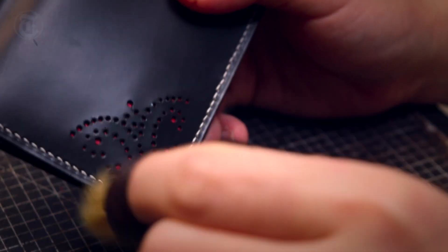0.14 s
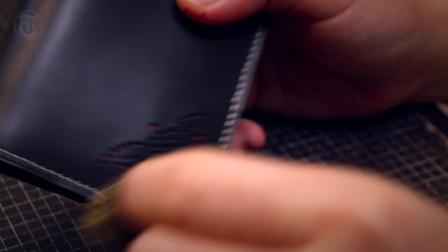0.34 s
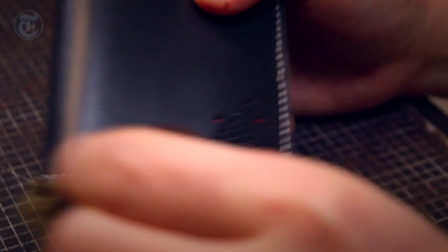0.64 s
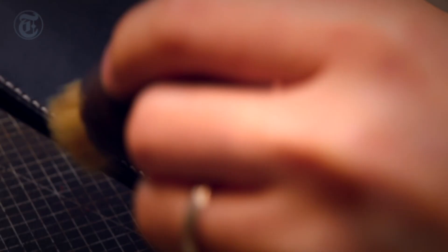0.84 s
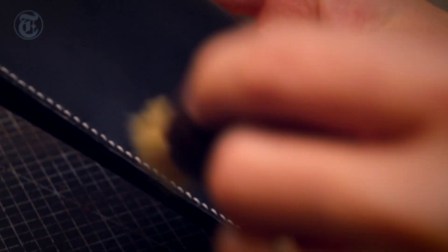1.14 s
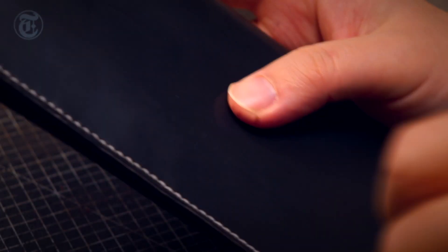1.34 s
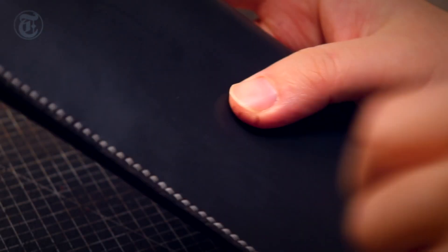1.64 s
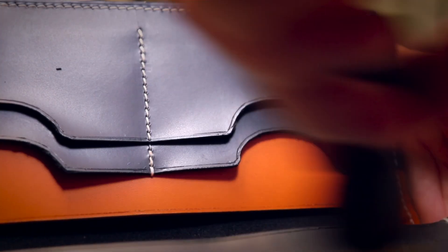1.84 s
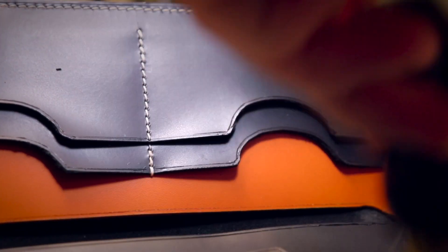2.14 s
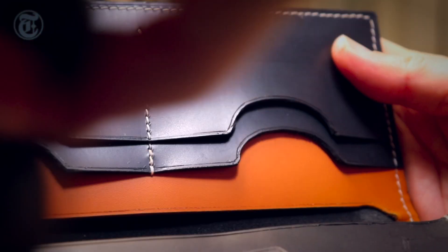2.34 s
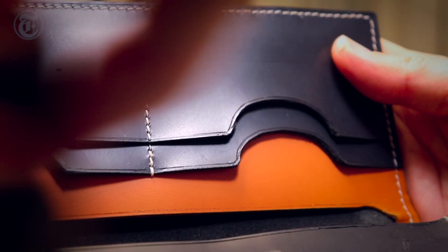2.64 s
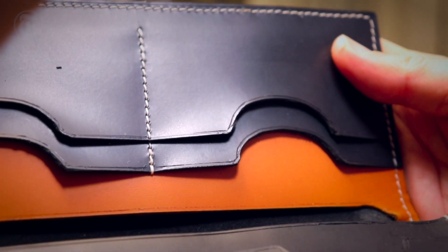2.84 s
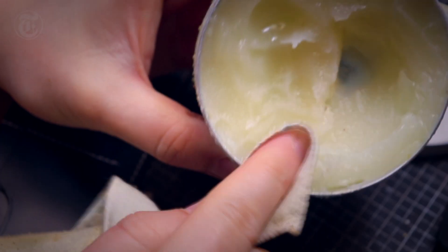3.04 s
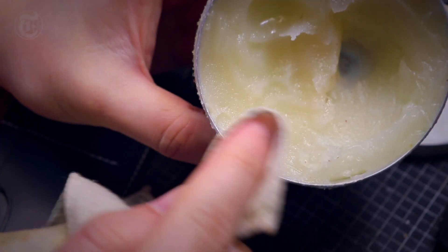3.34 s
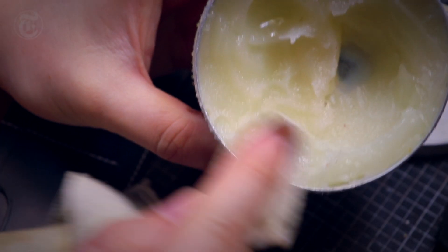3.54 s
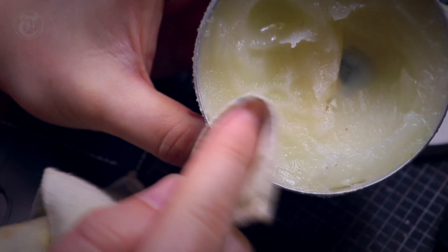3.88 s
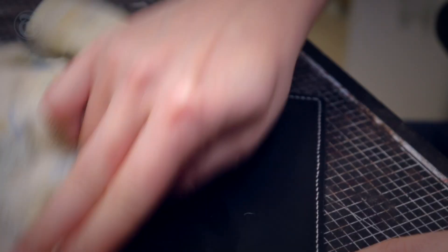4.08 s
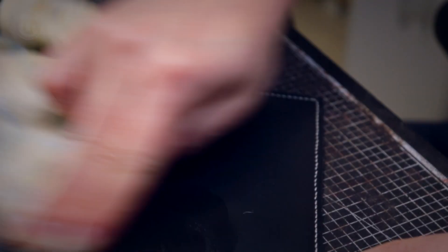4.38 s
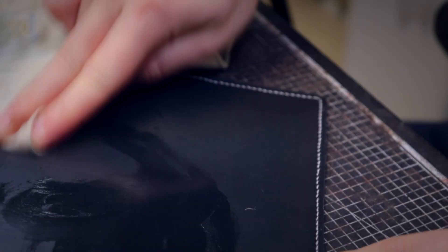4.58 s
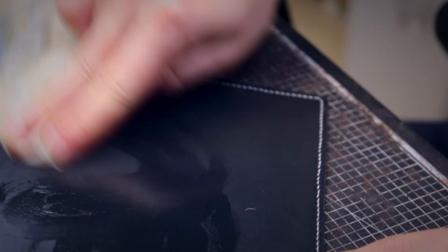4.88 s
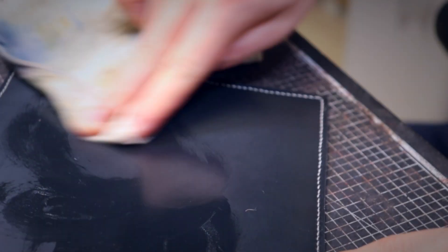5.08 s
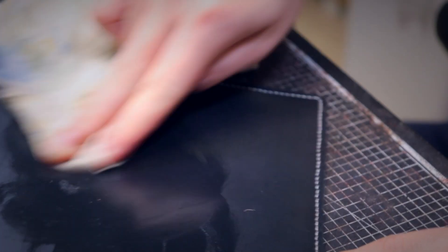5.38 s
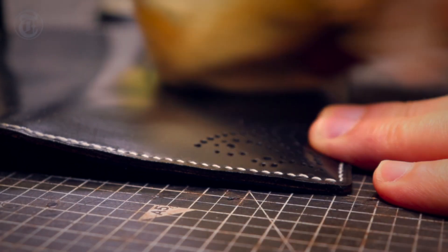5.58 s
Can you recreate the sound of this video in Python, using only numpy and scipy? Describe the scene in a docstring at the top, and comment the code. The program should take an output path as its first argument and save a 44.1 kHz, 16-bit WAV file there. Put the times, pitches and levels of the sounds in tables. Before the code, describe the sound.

Dry, close, centred handling sounds over quiet hum, hiss and faint rumble. First come irregular brisk brush swishes on a leather wallet, some starting with a tuft slap; next three fuller scratchy sweeps across inner pockets, catching on edges. A near-quiet gap holds only faint dabs and tiny sharp clicks of balm and tin. Then steady soft cloth friction swells about eight times a second, with small gripping scrapes and dull bumps, before a smooth final wipe.

```python
"""Brushing and balming a leather wallet

A small bristle brush sweeps seven times over the outside of the wallet, then three times over its inner
pockets. A cloth-wrapped finger picks up balm from a tin with sticky ticks, then rubs it into the leather.
Rubbing is random fibre slips through resonant filters; slaps and snaps are short filtered excitations.
A hollow room resonance near 900 Hz answers strokes, slaps and grips; hum, hiss and rumble lie under it, in mono."""
import sys
import numpy as np
from scipy import signal
from scipy.fft import rfft, irfft
from scipy.io import wavfile
from scipy.ndimage import uniform_filter1d

SR = 44100
rng = np.random.default_rng(int(sys.argv[2]) if len(sys.argv) > 2 else 0)


def generate_wav(signal):
    """Clip the signal to [-1, 1] and save it as 16-bit WAV at the path in sys.argv[1]."""
    frames = np.transpose(np.atleast_2d(signal))
    scaled = np.clip(frames, -1, 1) * 32767
    pcm = np.round(scaled).astype(np.int16)
    wavfile.write(sys.argv[1], SR, pcm)


N = 252115

TIME = np.arange(N) / SR  # s
TAPS = 8192  # filter design length, samples
HZ = np.fft.rfftfreq(TAPS, 1 / SR)
LAND_S = .006  # the fibres touch down
# spectrum of the cloth's contact: frequency_hz, relative density_db (per Hz)
CLOTH_SPECTRUM = [(650, -23), (1100, -1), (1640, -3.5), (1790, 1.5), (2070, -3.5), (3660, 2.5),
                  (4140, -2.5), (5440, 1), (7380, -3), (14100, -1.5), (15200, -4), (15900, -12),
                  (16500, -42)]


def amp(db):
    """Level law: decibels to amplitude ratio."""
    return 10 ** (np.asarray(db) / 20)


def evened(x):
    """Power normalization: scales to rms 1."""
    return x / np.sqrt(np.mean(x ** 2) + 1e-20)


def shape(points, modes=()):
    """Resonance on a continuum: a smooth spectrum, in log frequency, multiplied by resonant bumps."""
    hz, db = np.transpose(points)
    bumps = sum(lift / (1 + (2 * (HZ - f) / width) ** 2) for f, width, lift in modes)
    return amp(np.interp(np.log(HZ + 1), np.log(hz), db) + bumps)


def colour(x, gain):
    """Minimum-phase filtering that keeps the power of white input: resonances ring after their excitation."""
    cepstrum = irfft(np.log(np.maximum(evened(gain), 1e-4)))
    # folding the cepstrum onto positive times makes the filter causal
    cepstrum[1:] *= 2 * (np.arange(1, TAPS) < TAPS / 2)
    impulse_response = irfft(np.exp(rfft(cepstrum)))[:TAPS // 2]
    return signal.oaconvolve(x, impulse_response)[:len(x)]


def grains(per_s):
    """Shot noise: tiny slips of single fibres at random moments, of random size and sign."""
    slipping = rng.random(N) < per_s / SR
    return evened(rng.standard_normal(N) * slipping)


def flutter(rate_hz, depth_db):
    """Stick-slip modulation: a gain of mean power 1 wanders at random as fibres stick and let go."""
    lowpass = signal.butter(2, rate_hz, fs=SR, output="sos")
    slow = signal.sosfilt(lowpass, rng.standard_normal(N))
    return evened(amp(depth_db * evened(slow)))


def burst(s, length):
    """Transient envelope: a push swells to 1 at length / e and dies away, with an area equal to its length."""
    u = np.maximum(TIME - s, 0) / max(length, 1e-4) * np.e
    return u * np.exp(1 - u)


def hum(blend_s=0.0029):
    """Superposed sinusoids: mains hum whose level and phase step, each step making a soft low bump."""
    mains_hz = 60
    # fundamental: start_s, rms_db
    hum_steps = [(0, -41.5), (.845, -42), (1.746, -46), (2.02, -46), (2.913, -47.5), (4.013, -41.3),
                 (5.482, -42.5)]
    # overtones: frequency_hz, rms_db
    hum_overtones = [(120, -66.5), (300, -69)]
    starts, db = np.transpose(hum_steps)
    phasors = amp(db) * np.exp(2j * np.pi * rng.random(len(db)))
    held = phasors[np.maximum(np.searchsorted(starts, TIME, side="right") - 1, 0)]
    for _ in range(2):
        held = uniform_filter1d(held, max(round(blend_s * SR), 1))
    fundamental = (held * np.exp(2j * np.pi * mains_hz * TIME)).real
    overtones = sum(amp(level) * np.sin(2 * np.pi * (hz * TIME + rng.random()))
                    for hz, level in hum_overtones)
    return np.sqrt(2) * (fundamental + overtones)  # sqrt(2) turns rms into peak


def room(hiss_db=-56, rumble_db=-63):
    """Stationary noise: steady hiss with the room's resonances, over a faint rumble."""
    # frequency_hz, relative density_db (per Hz)
    hiss_spectrum = [(76, -28.5), (130, -6), (270, -4), (774, -11.5), (928, -7.5), (1030, -13), (1280, -12),
                     (1390, -14.5), (1600, -15), (3130, -19), (5520, -21), (14900, -24.5), (16500, -41)]
    rumble_spectrum = [(12, -13), (30, 7), (55, 2), (110, -4.5), (170, -15), (300, -54), (1000, -70)]
    # room resonances: frequency_hz, width_hz, lift_db
    room_modes = [(337, 92, 2.5), (910, 84, 5)]
    hiss = colour(rng.standard_normal(N), shape(hiss_spectrum, room_modes))
    rumble = colour(rng.standard_normal(N), shape(rumble_spectrum))
    return amp(hiss_db) * hiss + amp(rumble_db) * rumble


def sweep(strokes, ring_below_db):
    """Speed-dependent friction: rasp, fizz and ring levels as the hand lands, speeds up, slows and lifts."""
    lift_db_per_s = 605
    trail_db, trail_db_per_s = -14.5, 150  # a faint rustle trails each stroke
    fizz_power, ring_power = 1.47, 0.35  # how steeply fizz and hollow ring follow the speed
    level = np.zeros((3, N))
    for start, length, fastest, db, swell_db, fizz_db in strokes:
        t = TIME - start
        phase = np.interp(t, [0, min(fastest, .95 * length), length], [0, np.pi / 2, np.pi])
        speed = amp(-swell_db * np.cos(phase) ** 2)
        lifted = np.maximum(t - length, 0)
        release = np.maximum(amp(-lift_db_per_s * lifted), amp(trail_db - trail_db_per_s * lifted))
        contact = amp(db) * np.clip(t / LAND_S, 0, 1) * release
        fizz = amp(fizz_db) * speed ** fizz_power
        ring = amp(ring_below_db) * speed ** ring_power
        level += contact * np.array([speed, fizz, ring])
    return level


def shimmer(x, depth_db, hold_s=.045, width_hz=260):
    """Time-frequency modulation: narrow bands of the hiss come and go at random."""
    window, hop = 512, 128  # samples
    z = signal.stft(x, nperseg=window, noverlap=window - hop)[2]
    frames, bins = hold_s * SR / hop, width_hz * window / SR
    patches = uniform_filter1d(rng.standard_normal(z.shape), max(round(bins), 1), axis=0)
    patches = evened(uniform_filter1d(patches, max(round(frames), 1), axis=1))
    patchy = z * evened(amp(depth_db * patches))
    return signal.istft(patchy, nperseg=window, noverlap=window - hop)[1][:N]


def room_ring(drive, focus, tuning=1):
    """Forced resonance: the room's hollow answer; low focus broadens it, tuning scales its pitches."""
    # before focus and tuning: frequency_hz, relative density_db (per Hz)
    ring_spectrum = [(200, -22.5), (330, -24), (450, -16.5), (620, -13), (720, -6.5), (820, 2), (930, -1),
                     (1080, -7.5), (1350, -9.5), (1900, -25.5), (3500, -46.5)]
    tuned = [(hz * tuning, db) for hz, db in ring_spectrum]
    return colour(drive, shape(tuned) ** focus)


def rub(level, spectrum, slips_per_s, flutter_db, judder_db, patchy_db, rasp_db, fizz_db, focus,
        tuning=1, split_hz=7400):
    """Stick-slip friction: bent fibres rasp, light tips fizz, and a hollow resonance answers their drag."""
    # resonances that colour all rubbing: frequency_hz, width_hz, lift_db
    leather_modes = [(2110, 160, 1), (2417, 82, 3.5), (3620, 400, 1), (4940, 140, 2), (5750, 250, 0)]
    rasp, fizz, ring = level * flutter(33, flutter_db)
    gain = shape(spectrum, leather_modes)
    low_share = 1 / (1 + (HZ / split_hz) ** 8)  # share of power below the split
    rasp_slips = rasp * shimmer(grains(slips_per_s), patchy_db)
    fizz_slips = fizz * shimmer(grains(2 * slips_per_s), patchy_db)
    sound = amp(rasp_db) * colour(rasp_slips, gain * np.sqrt(low_share))
    sound += amp(fizz_db) * colour(fizz_slips, gain * np.sqrt(1 - low_share))
    judder = ring * flutter(74, judder_db) * grains(slips_per_s)
    return sound + room_ring(judder, focus, tuning)


def brush():
    """Friction noise of bristles: short bright strokes outside, longer and duller ones on the pockets."""
    # start_s, length_s, fastest_s (after start), relative rasp_db, swell_db, fizz_db (against rasp)
    outer_strokes = [ (.06, 0.098, 0.083, -35, 7.5, -3), (.318, 0.083, 0.069, -34, 6, -4.5),
                     (.47, 0.098, 0.073, -51, 9.6, -11), (.598, 0.12, 0.051, -36, 7.7, -2),
                     (.872, 0.16, 0.13, -35, 7.7, -2.5), (1.27, 0.12, 0.05, -35, 6, 0.5),
                     (1.595, 0.12, 0.093, -36.5, 3.3, -5)]
    inner_strokes = [ (1.805, 0.2, 0.16, -32, 9.7, -5), (2.192, 0.22, 0.16, -34.5, 5.7, -6),
                     (2.625, 0.2, 0.11, -36, 4.2, -7.5)]
    # frequency_hz, relative density_db (per Hz)
    outer_spectrum = [(650, -50), (1100, -4), (1480, -4.5), (2120, -2.5), (2400, -3.5), (2850, -1.5),
                      (3660, 2.5), (4480, -4), (5950, -1.5), (7380, -9.5), (11100, -7.5), (14200, -10),
                      (15200, -10), (15900, -22), (16500, -51)]
    inner_spectrum = [(650, -28), (1100, -13), (1270, -21), (1550, -11), (1730, -6), (1920, 4), (2250, -2),
                      (2520, 2), (3260, 0.5), (5370, -1), (6090, -2.5), (9910, -15), (11100, -13.5),
                      (15600, -20.5), (16500, -41)]
    outer = rub(sweep(outer_strokes, ring_below_db=-12.5), outer_spectrum, slips_per_s=14000,
                flutter_db=1.0, judder_db=3.0, patchy_db=2.5, rasp_db=-3.0, fizz_db=-0.5,
                focus=1.25, tuning=1.023)
    inner = rub(sweep(inner_strokes, ring_below_db=-13), inner_spectrum, slips_per_s=15000,
                flutter_db=1.6, judder_db=1.5, patchy_db=3.0, rasp_db=-2.5, fizz_db=0, focus=0.67)
    return outer + inner


def slaps(hits_per_s=7000, slap_db=-5, ring_db=-4, shut_focus=1.38, open_focus=0.92, tuning=1.013,
          width_hz=1400, lift_db=6):
    """Impact excitation: tufts land or catch on an edge, each spot with its own pitch and a hollow ring."""
    opened_s = 1.75  # with the wallet opened, the ring is broader
    # start_s, relative slap_db, relative hollow_ring_db, length_s, pitch_hz
    slap_events = [ (0.06, -27, -32, 0.011, 3530), (0.3163, -27, -32, 0.014, 3460),
                   (0.5976, -28.5, -32.5, 0.01, 3780), (0.877, -38.5, -39.5, 0.046, 3310),
                   (1.0106, -35, -28.5, 0.014, 3510), (1.269, -34.5, -30, 0.018, 2000),
                   (1.361, -37.5, -39, 0.023, 1400), (1.5936, -40, -35.5, 0.021, 1300),
                   (1.805, -30, -29.5, 0.013, 1590), (1.818, -31.5, -28.5, 0.014, 1500),
                   (1.939, -28, -46, 0.014, 2600), (2.192, -29, -39.5, 0.031, 1480),
                   (2.3654, -29.5, -22.5, 0.0093, 1340), (2.386, -45, -29.5, 0.019, 3860),
                   (2.407, -30.5, -37.5, 0.017, 4120), (2.6233, -32.5, -30.5, 0.012, 2140),
                   (2.646, -35, -37, 0.018, 2500), (2.716, -42, -30.5, 0.012, 1600),
                   (2.785, -34.5, -31, 0.01, 1800)]
    # frequency_hz, relative density_db (per Hz)
    slap_spectrum = [(590, -17.5), (1000, -4), (1640, 3), (2500, 6), (3900, 1), (6530, -2.5), (7880, -12),
                     (11500, -9.5), (15400, -23), (15900, -34), (16500, -87)]
    out, strikes, shoves = np.zeros(N), grains(hits_per_s), grains(hits_per_s)
    for s, db, hollow_db, length, pitch in slap_events:
        part = slice(round(s * SR), round(s * SR) + TAPS)
        push = burst(s, length)[part]
        spot = shape(slap_spectrum, [(pitch, width_hz, lift_db)])
        focus = shut_focus if s < opened_s else open_focus
        out[part] += amp(db + slap_db) * colour(push * strikes[part], spot)
        out[part] += amp(hollow_db + ring_db) * room_ring(push * shoves[part], focus, tuning)
    return out


def zips(width_hz=1100):
    """Band-limited slip noise: tufts drag over a pocket edge or seam and hiss around one pitch."""
    # start_s, level_db, length_s, pitch_hz
    zip_events = [(0.615, -38.5, 0.033, 5100), (1.804, -36.5, 0.011, 6260), (2.189, -41, 0.015, 5650),
                  (2.384, -38.5, 0.026, 4120), (2.779, -44, 0.043, 3850)]
    out, skips = np.zeros(N), grains(9000)
    for s, db, length, pitch in zip_events:
        part = slice(round(s * SR), round(s * SR) + TAPS)
        band = 1 / (1 + ((HZ - pitch) / width_hz) ** 2) ** 2
        out[part] += amp(db) * colour((burst(s, length) * skips)[part], band)
    return out


def nudges():
    """Low-frequency transients: the hand presses down and the wallet or tin shifts with a dull bump."""
    # start_s, level_db, length_s
    nudge_events = [(2.32, -52, 0.054), (2.658, -53.5, 0.063), (2.728, -48, 0.046), (2.906, -50.5, 0.068),
                    (4.132, -47.5, 0.026), (4.278, -51, 0.023), (4.67, -50, .04), (4.968, -49.5, 0.033),
                    (5.448, -50.5, 0.058), (5.539, -49.5, .04)]
    # frequency_hz, relative density_db (per Hz)
    nudge_spectrum = [(70, -16), (120, -2), (200, -8), (320, -1), (480, -10), (800, -11.5), (2000, -30)]
    push = sum(amp(db) * burst(s, length) for s, db, length in nudge_events)
    return colour(push * rng.standard_normal(N), shape(nudge_spectrum))


def balm(after_s=0.0021, after_db=-25, width_hz=2200, body_db=-15):
    """Impulse response: threads of balm snap and the tin ticks as the cloth dabs and lifts."""
    # the cloth dabs in the balm: start_s, level_db, length_s
    dabs = [(2.929, -52.5, 0.017), (3.305, -57, .03), (3.49, -58, 0.043), (3.667, -55, 0.036)]
    # ticks of balm and tin: start_s, level_db, pitch_hz (nominal band centre)
    ticks = [(2.9345, -32, 1700), (3.1183, -28, 1900), (3.1483, -24, 10000), (3.168, -33, 13500),
             (3.1885, -27, 14000), (3.3562, -20.5, 14600), (3.4968, -28.5, 1900), (3.5, -34, 13000),
             (3.679, -33, 2000), (3.683, -30, 12500), (3.8653, -28.5, 2400), (3.9067, -19, 9500),
             (3.9075, -22, 14000)]
    # the tin under every tick: frequency_hz, relative gain_db
    tick_body = [(500, -30), (1200, -1), (3500, -6), (5800, -2), (7500, -13), (16000, -22)]
    push = sum(amp(db) * burst(s, length) for s, db, length in dabs)
    out = colour(push * grains(3000), shape(CLOTH_SPECTRUM))
    t = TIME[:TAPS]
    for s, db, pitch in ticks:
        tail = amp(after_db) * np.exp(-t / after_s) * rng.standard_normal(TAPS)
        snap = (t == 0) + tail  # one impulse, then decaying noise
        band = HZ / (HZ + 1000) / (1 + ((HZ - pitch) / width_hz) ** 2)
        band += amp(body_db) * shape(tick_body)
        out[round(s * SR):][:TAPS] += amp(db) * colour(snap, band)
    return out


def circles():
    """Power addition: rasp and fizz swell above a steady drag with every push; the ring stays level."""
    drag_db, ring_db = -50.5, -57.5  # relative
    # the cloth stays on the leather: start_s, end_s
    circling_s = (4.012, 5.49)
    # pushes of the circling cloth: fastest_s, relative rasp_db, relative fizz_db, half_width_s (to 1/e power)
    pushes = [ (4.04, -47.5, -47.5, 0.032), (4.161, -40.5, -40, 0.064), (4.31, -46, -45.5, 0.077),
              (4.43, -41, -44, 0.046), (4.55, -41.5, -41.5, 0.049), (4.68, -41.5, -39.5, 0.048),
              (4.8, -42.5, -38.5, 0.027), (4.87, -46.5, -42.5, 0.065), (4.969, -41.5, -41, 0.045),
              (5.09, -41, -39, .037), (5.22, -43.5, -42, 0.064), (5.34, -44.5, -44.5, 0.062),
              (5.455, -40.5, -51, 0.034)]
    touching = np.clip(np.minimum(TIME - circling_s[0], circling_s[1] - TIME) / LAND_S, 0, 1)
    power = amp([[drag_db], [drag_db], [ring_db]]) ** 2 * np.ones(N)
    for s, rasp_db, fizz_db, width in pushes:
        power[:2] += amp([[rasp_db], [fizz_db]]) ** 2 * np.exp(-((TIME - s) / width) ** 2)
    return touching * np.sqrt(power)


def cloth(scrape_db=-7, scrape_hz=1600, scrape_width_hz=900):
    """Dense stick-slip: soft fibres give a finer hiss; where they grip, a scrape and a hollow ring sound."""
    # flatter wipes: start_s, length_s, fastest_s (after start), relative rasp_db, swell_db,
    # fizz_db (against rasp)
    wipes = [ (5.485, 0.17, 0.06, -37.5, 3, -5), (5.668, .08, 0.047, -44, 7.4, 2)]
    # frequency_hz, relative density_db (per Hz)
    wipe_spectrum = [(650, -49), (1100, -5), (1560, -4), (1710, -8), (1940, -2), (2430, -4), (3570, 1),
                     (5500, 3), (14900, 2), (15900, -12), (16500, -38)]
    # the cloth grips the waxy leather: start_s, relative level_db, length_s
    catches = [ (4.01, -47, 0.019), (4.095, -45.5, 0.035), (4.33, -48.5, 0.023), (4.41, -49, 0.033),
               (4.505, -45.5, 0.041), (4.645, -40.5, 0.039), (4.705, -46, 0.02), (4.895, -50, 0.026),
               (4.955, -46, 0.029), (5.06, -62, 0.033), (5.225, -47, 0.039), (5.415, -45, 0.05),
               (5.454, -44, 0.024), (5.549, -47, 0.028)]
    circling = rub(circles(), CLOTH_SPECTRUM, slips_per_s=20000, flutter_db=0.93, judder_db=4,
                   patchy_db=2.2, rasp_db=-1.5, fizz_db=-1.5, focus=0.66, tuning=1.09)
    wiping = rub(sweep(wipes, ring_below_db=-20), wipe_spectrum, slips_per_s=30000, flutter_db=0.5,
                 judder_db=2.0, patchy_db=-0.5, rasp_db=-1, fizz_db=0, focus=0.82)
    grip = sum(amp(db) * burst(s, length) for s, db, length in catches)
    highpass = HZ ** 2 / (HZ ** 2 + scrape_hz ** 2)
    band = highpass / (1 + ((HZ - scrape_hz) / scrape_width_hz) ** 2)
    scrape = amp(scrape_db) * colour(grip * grains(6000), band)
    ring = room_ring(grip * grains(12000), focus=1.02, tuning=1.116)
    return circling + wiping + scrape + ring


def scene():
    """Linear superposition: all sources add to one signal, which feeds both channels."""
    mono = hum() + room() + brush() + slaps() + zips() + nudges() + balm() + cloth()
    return np.array([mono, mono])


def record(dry):
    """Band limiting: a linear-phase low-pass forms the recorder's upper edge."""
    edge_hz = 16050
    lowpass = signal.firwin(511, edge_hz, window=("kaiser", 9), fs=SR)
    return signal.oaconvolve(dry, lowpass[None], "same")


dry = scene()
out = record(dry)
generate_wav(out)
```